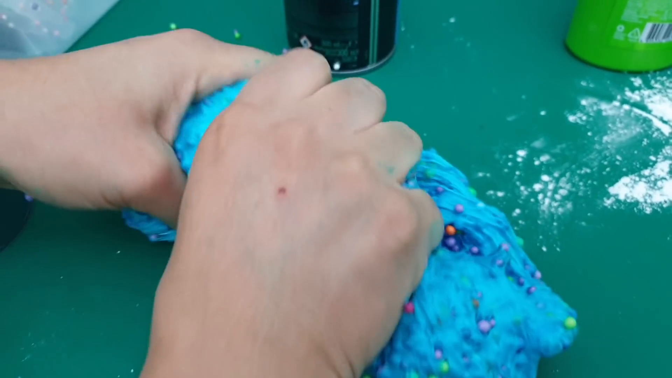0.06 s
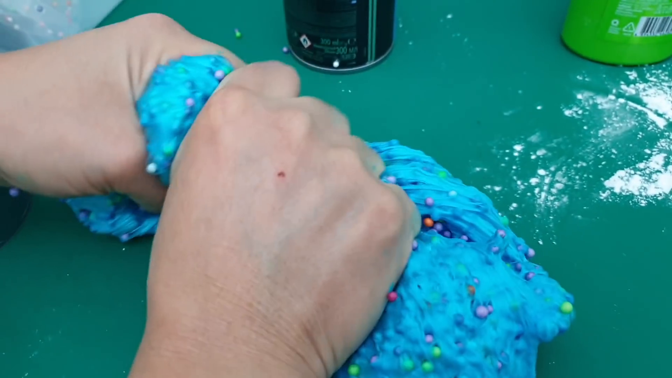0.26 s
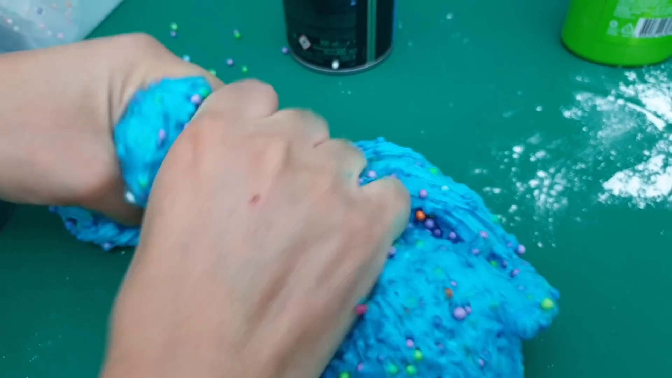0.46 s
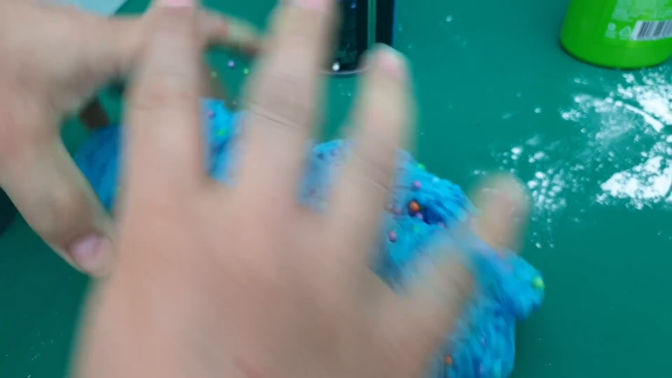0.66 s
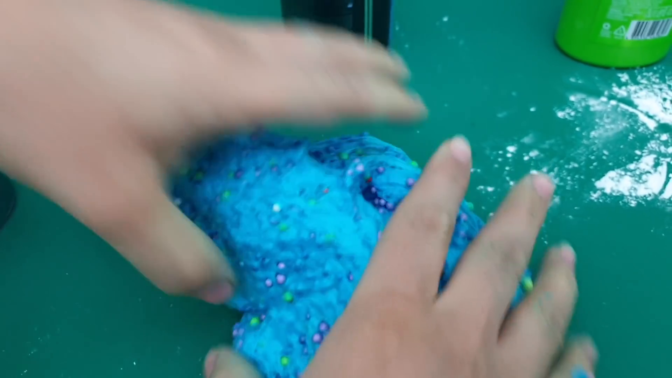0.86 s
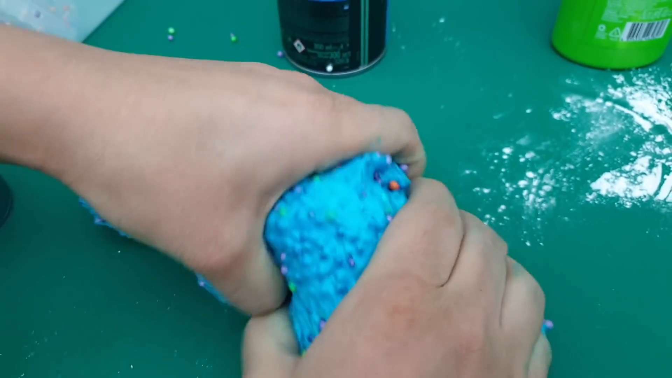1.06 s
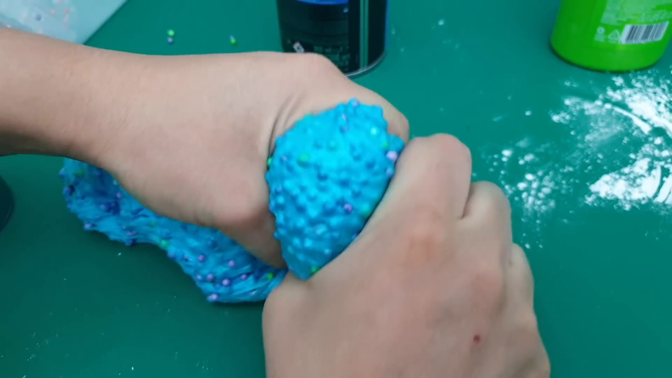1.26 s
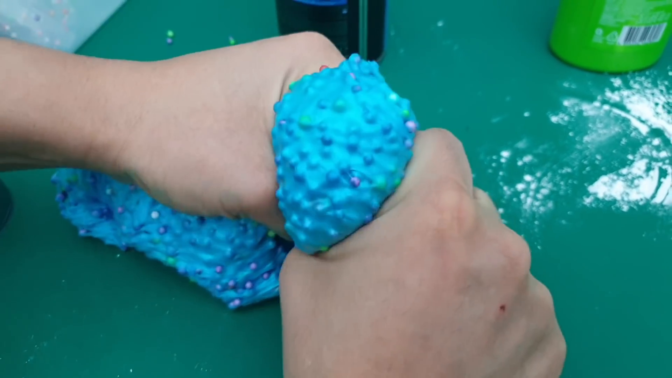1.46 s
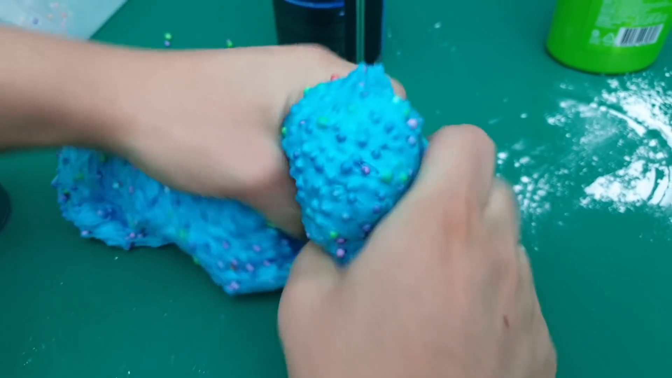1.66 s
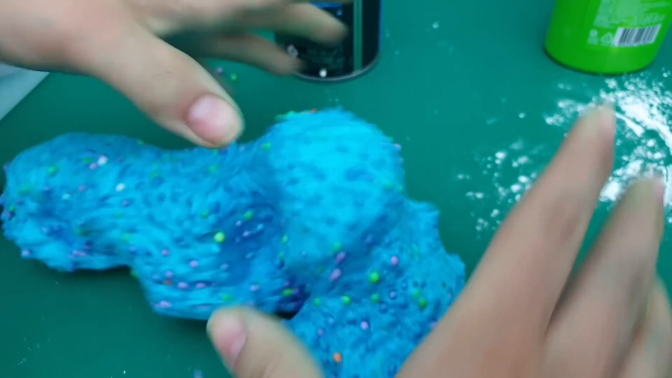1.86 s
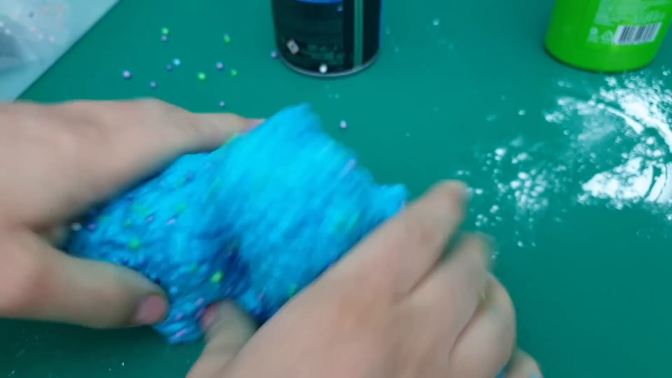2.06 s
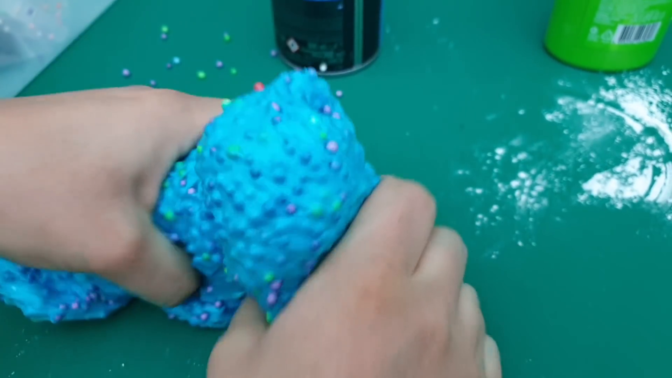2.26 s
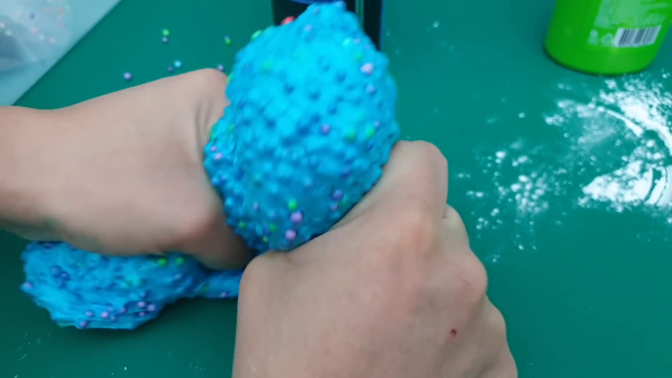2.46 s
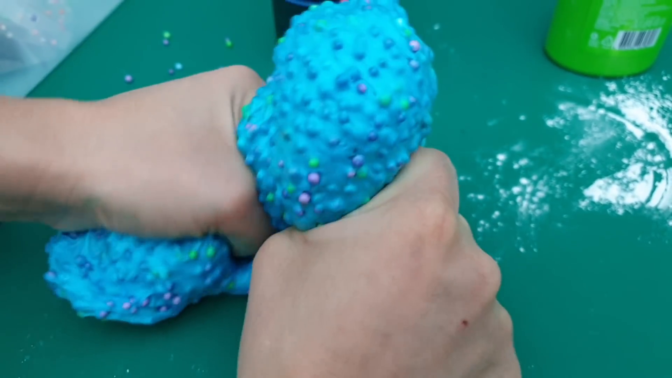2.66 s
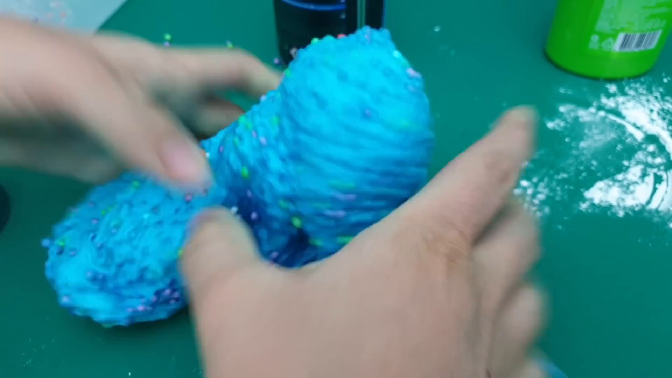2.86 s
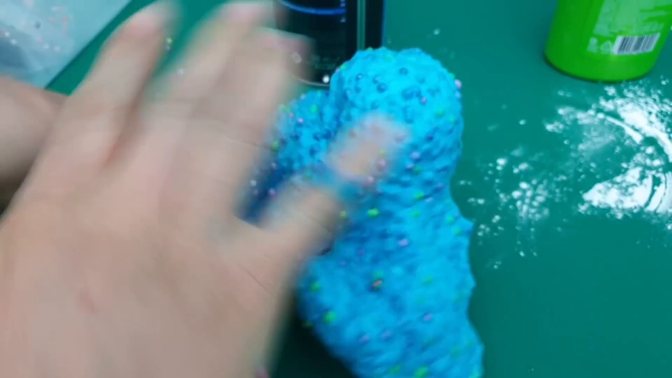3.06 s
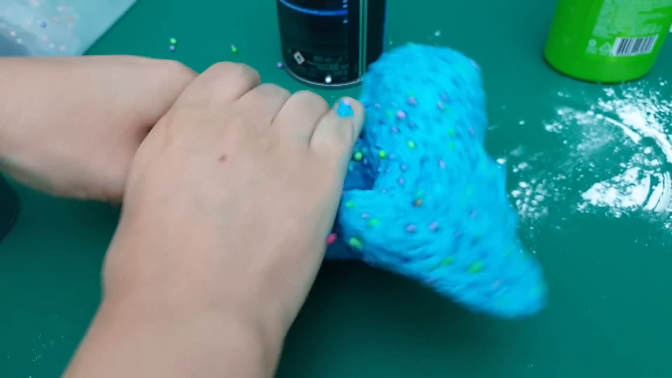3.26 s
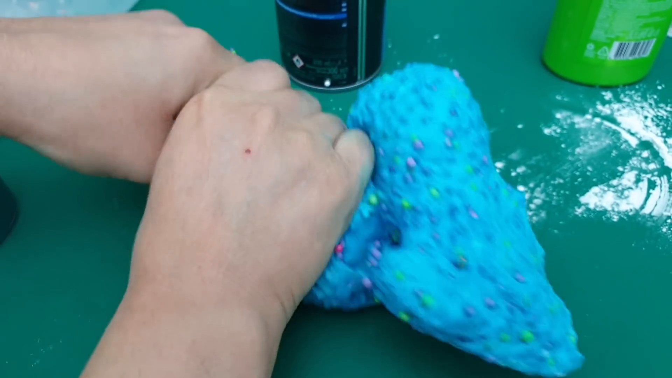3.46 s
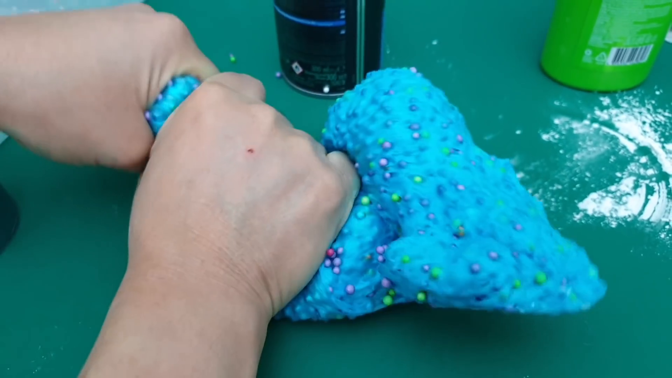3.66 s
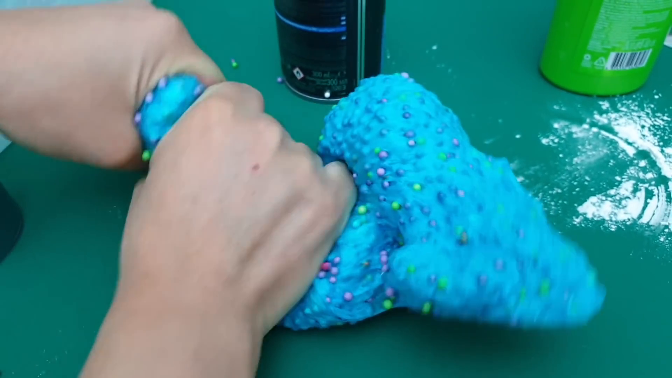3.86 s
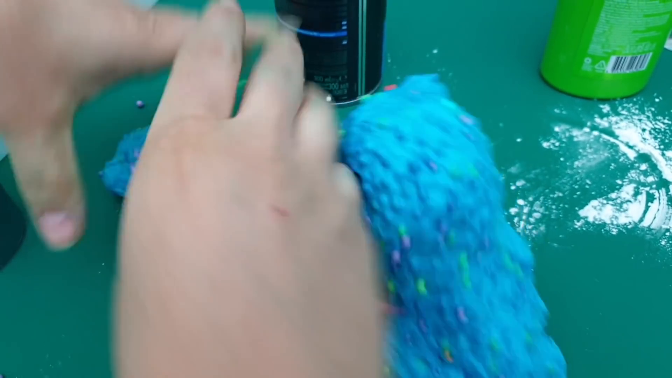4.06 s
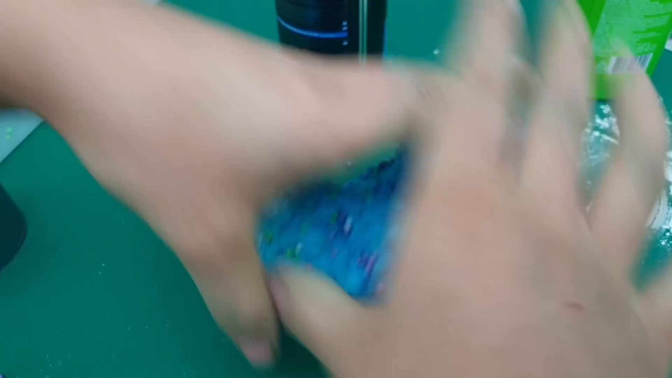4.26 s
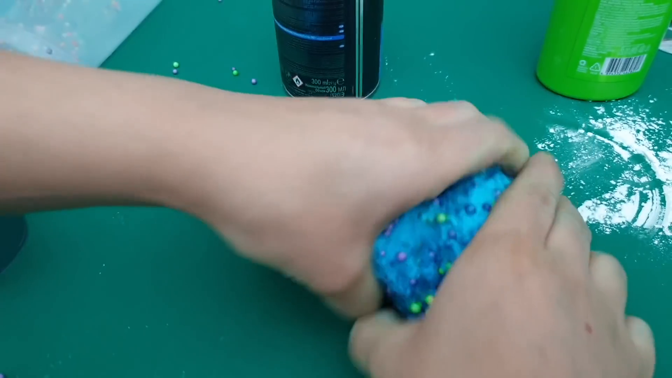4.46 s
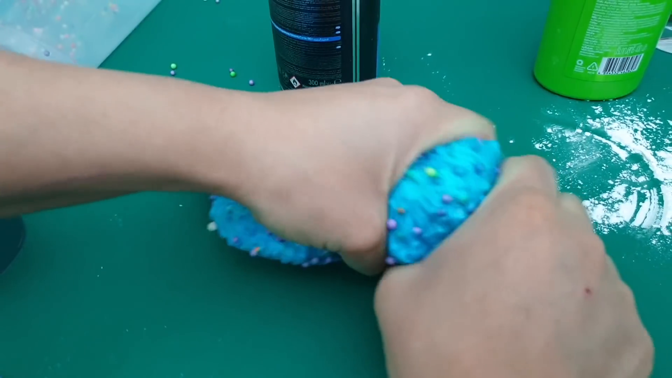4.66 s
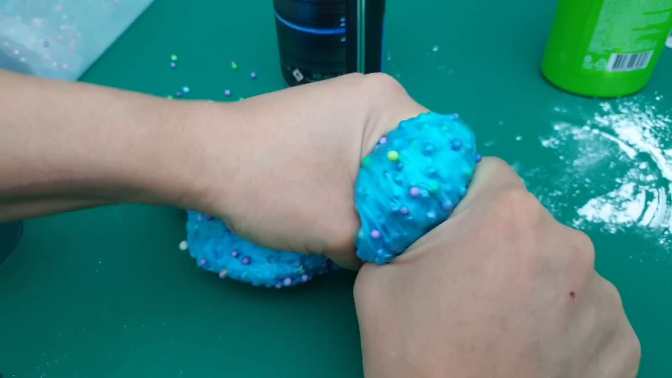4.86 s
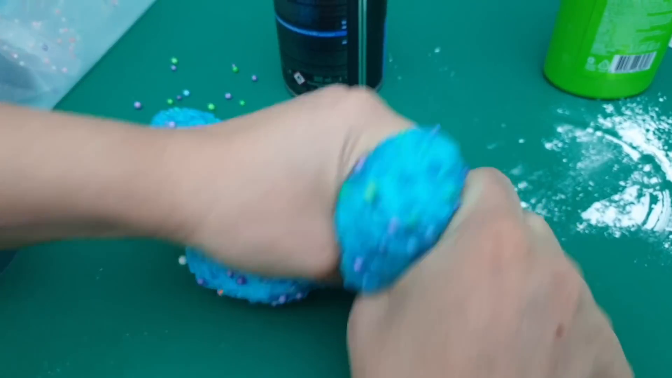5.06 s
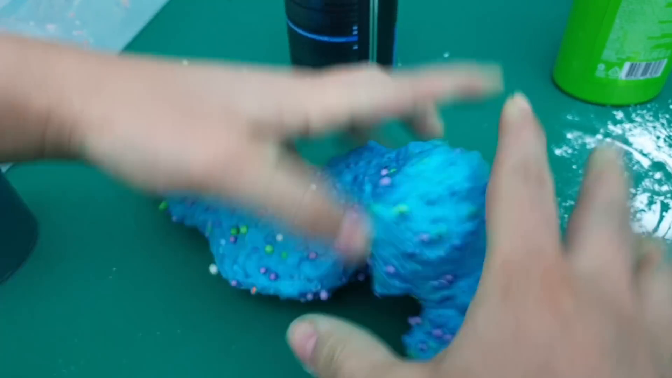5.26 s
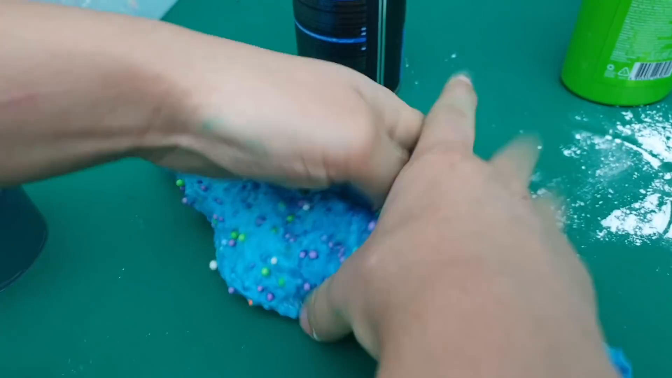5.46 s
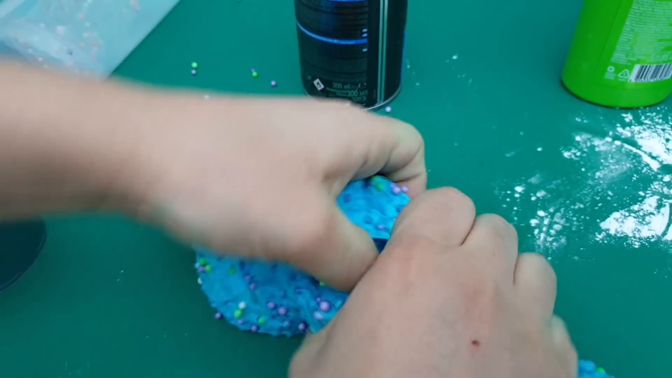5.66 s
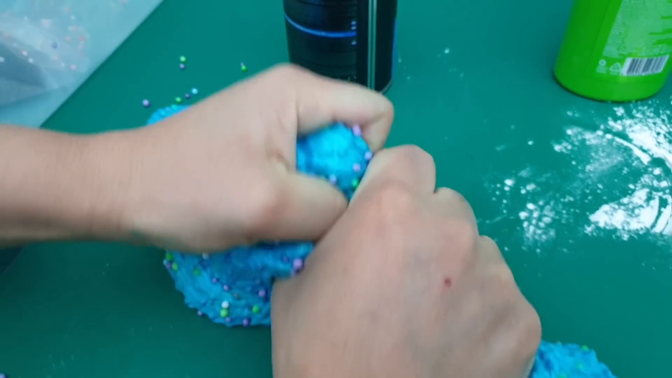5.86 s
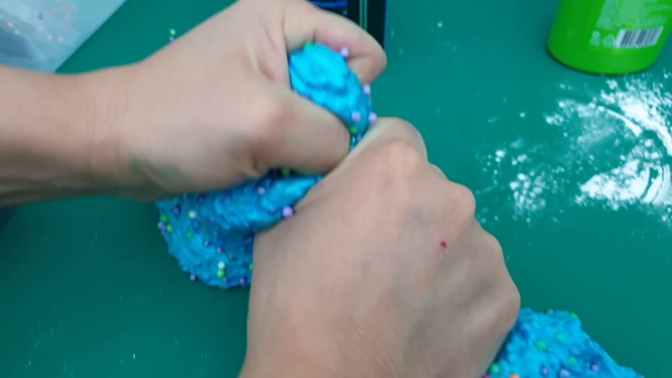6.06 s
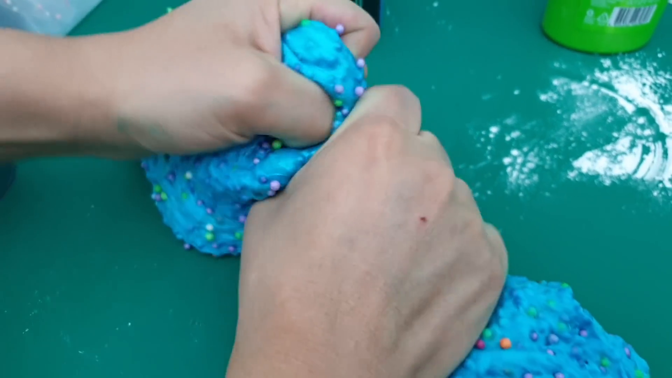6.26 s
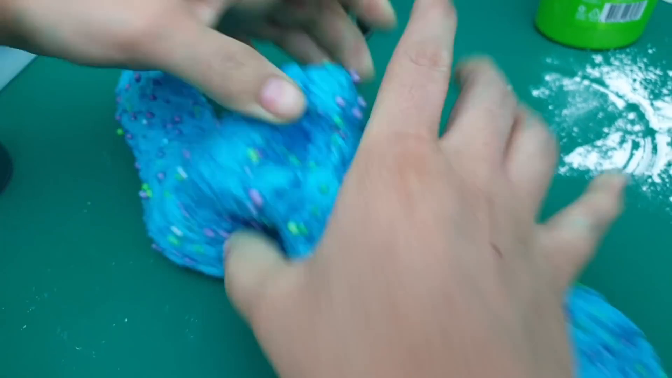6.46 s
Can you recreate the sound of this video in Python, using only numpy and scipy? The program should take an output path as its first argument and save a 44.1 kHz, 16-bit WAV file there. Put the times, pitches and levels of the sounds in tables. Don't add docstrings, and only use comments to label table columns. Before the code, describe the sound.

Close-up slime kneading: six squeezes of crisp snapping pops and fizzing beads, separated by sticky peels, small glugs and dull thumps.

```python
import sys
import numpy as np
from scipy import signal
from scipy.fft import rfft, irfft
from scipy.io import wavfile

SR = 44100
rng = np.random.default_rng(int(sys.argv[2]) if len(sys.argv) > 2 else 0)


def amplitude_ratio(level_db):
    exponent = np.asarray(level_db, float) / 20
    return 10 ** exponent


def generate_wav(signal):
    frames = np.transpose(np.atleast_2d(signal))
    scaled = np.clip(frames, -1, 1) * 32767
    pcm = np.round(scaled).astype(np.int16)
    wavfile.write(sys.argv[1], SR, pcm)


N = 287532


def rms_one(x):
    return x / np.sqrt(np.mean(x ** 2) + 1e-20)


def top_one(x):
    return x / abs(x).max(axis=-1, keepdims=True)


def louder(*levels_db):
    return 10 * np.log10(sum(amplitude_ratio(2 * np.maximum(db, -120)) for db in levels_db))


def in_time(s, db, rise, fall):
    t = np.arange(N) / SR
    before = rise * np.maximum(s[0] - t, 0)
    after = fall * np.maximum(t - s[-1], 0)
    return np.interp(t, s, db) - before - after


def at_hz(points, hz):
    point_hz, point_db = np.transpose(points)
    return np.interp(np.log(hz + 1), np.log(point_hz), point_db)


def add(out, sound, s):
    i = round(s * SR)
    out[..., i:i + sound.shape[-1]] += sound[..., :N - i]


def band(x, low_hz, high_hz):
    sos = signal.butter(2, [low_hz, min(high_hz, .45 * SR)], "band", fs=SR, output="sos")
    return signal.sosfilt(sos, x)


def ring(x, hz, t60):
    r, w = amplitude_ratio(-60 / (t60 * SR)), 2 * np.pi * hz / SR
    return signal.lfilter([0, np.sin(w)], [1, -2 * r * np.cos(w), r * r], x + 1e-18)


def peak(x, hz, width, db):
    a, w = amplitude_ratio(db / 2), 2 * np.pi * hz / SR
    k = np.sin(w) * width / hz / 2
    return signal.lfilter([1 + k * a, -2 * np.cos(w), 1 - k * a],
                          [1 + k / a, -2 * np.cos(w), 1 - k / a], x)


def drift(rate):
    r = np.exp(-80 * np.pi * rate / SR)
    noise = rng.standard_normal(N // 40 + 2002)
    slow = signal.lfilter([1], [1, -2 * r, r * r], noise)[2000:]
    return np.interp(np.arange(N) / 40, np.arange(len(slow)), rms_one(slow))


def grains(per_s, spread_db, clump_db, pan_db):
    born = rng.random(N) < per_s * amplitude_ratio(clump_db * drift(25)) / SR
    size_db = spread_db * np.minimum(rng.exponential(1, N), 3)
    sizes = born * amplitude_ratio(size_db) * rng.choice([-1, 1], N)
    side = amplitude_ratio(pan_db * rng.uniform(-1, 1, N))
    return np.array([sizes * side, np.roll(sizes / side, 7)])


def tears(clicks):
    return signal.lfilter([1], [1, -.93], abs(clicks)) * rng.standard_normal((2, N))


# frequency in Hz, level in dB per Hz.
HUSH_SPECTRUM = [(18, -42), (30, -12), (71, 23), (194, -12), (780, -34), (1250, -22), (6550, -23),
                 (8740, -51)]


def hush():
    level_db = -77.5
    hz = np.fft.rfftfreq(N, 1 / SR)
    mid, side = rfft(rng.standard_normal((2, N))) * amplitude_ratio(at_hz(HUSH_SPECTRUM, hz))
    share = np.clip(hz / 1200, .25, 1)
    noise = irfft(np.array([mid + share * side, mid - share * side]), N)
    return amplitude_ratio(level_db) * rms_one(noise)


# grip closes in seconds, hardest in seconds, lets go in seconds,
# crackle level in dB, left-right balance in dB.
SQUEEZES = [
    (0.0, 0.34, 0.33, -37, -8),
    (1.1, 1.395, 1.46, -37.5, -12),
    (2.262, 2.558, 2.536, -37, -8.5),
    (3.308, 3.773, 3.63, -45.5, 8.5),
    (4.648, 4.845, 4.92, -35.5, -13),
    (5.895, 5.973, 5.98, -40, -13),
]


def squeezing():
    swell_db, sag_db = 9.5, -1
    close_db_per_s, open_db_per_s = 187, 104
    levels = []
    for grip, hardest, off, db, pan_db in SQUEEZES:
        corners_db = [db - swell_db, db, db - sag_db]
        levels.append(in_time([grip, hardest, off], corners_db, close_db_per_s, open_db_per_s))
    return louder(*levels)


def crackle(level_db, bright_db):
    snaps = tears(grains(600, spread_db=3.4, clump_db=4.5, pan_db=4.0))
    body = amplitude_ratio(level_db - 1.5) * rms_one(band(snaps, 1200, 7660))
    fizz = amplitude_ratio(bright_db - 6.5) * rms_one(band(snaps, 6550, 14900))
    return body + fizz


# start in seconds, peak in dB, dull part in dB, brightness in dB, pocket pitch in Hz.
POPS_1 = [(0.0079, -22, -6, -18, 3580), (0.0171, -28, -17, -14, 6250), (0.0373, -9.5, -15, -14, 5410),
          (0.0487, -28, -18, -20, 4580), (0.052, -11.5, -24, -23, 5110), (0.0678, -11, -10, -20, 5100),
          (0.0701, -15, -16, -11, 6240), (0.1045, -28, -12, -17, 4210), (0.1088, -32, -16, -12, 5440),
          (0.1219, -9, -16, -12, 6080), (0.125, -15.5, -21, -10, 4220), (0.1359, -17.5, -15, 1.5, 5680),
          (0.148, -30, -25, -7, 6460), (0.1543, -12, -26.5, -13, 4590), (0.1672, -21, -17.5, -5, 4890),
          (0.1783, -22, -26, -1.5, 6160), (0.2005, -6.5, -12, -11, 5300), (0.2155, -21, -17, 1, 5060),
          (0.22, -17.5, -24, -0.5, 6910), (0.2488, -7.5, -12, -8, 6990), (0.2524, -14, -13, 2, 4700),
          (0.2913, -17, -10, -9, 5800), (0.3089, -15.5, -21, 2.5, 6730), (0.32, -16.5, -19, 6.5, 7020),
          (0.3377, -15.5, -26, 5.5, 8290), (0.357, -25, -16, 7, 7690), (0.3874, -5, -14, -6, 5190),
          (0.4212, -22, -23, 0.5, 6530), (0.427, -16.5, -29, -17, 6610), (0.4415, -13.5, -28, -16, 6210),
          (0.466, -18.5, -33, 2.5, 6430), (0.6403, -35, 2, -13, 5020), (0.6486, -31, -1, -14, 3290),
          (0.6951, -24.5, -21, -15, 6000)]
POPS_2 = [(1.0354, -34, -19, -24, 3450), (1.0579, -42, -13, -11, 6050), (1.068, -22.5, -13, -3.5, 7400),
          (1.0807, -31, -4, -14, 5750), (1.0906, -35, -12, -2, 5330), (1.1049, -24.5, -15, -16, 4770),
          (1.129, -34, -10, -16, 5230), (1.1505, -26, -13, -17, 5180), (1.1654, -29, -8, -7, 6390),
          (1.1682, -14, -10, -7, 6000), (1.172, -23, -8, -16, 5870), (1.211, -22.5, -10, -20, 5250),
          (1.263, -29.5, -25, -14, 5060), (1.2659, -19, -11, -7, 4890), (1.2895, -18, -19, -8, 4390),
          (1.327, -18.5, -16, -9, 5340), (1.332, -22, -8, -16, 4680), (1.3386, -18, -11, -10, 4960),
          (1.3499, -16.5, -15, -19, 5200), (1.3727, -16, -8, -14, 3990), (1.3931, -16.5, -3, -14, 6800),
          (1.408, -8, -29, -15, 6260), (1.4315, -8, -23, -22, 5160), (1.4423, -37, -16, -12, 5160),
          (1.447, -18.5, -21, -5, 5850), (1.4793, -22, -16, -6, 5100), (1.4825, -21, -12, -13, 5580),
          (1.4878, -21, -20, -8, 5620), (1.5283, -17.5, -6, -8, 5260), (1.5465, -24, 8, 0, 4780),
          (1.5599, -14, -22, -20, 5340), (1.5945, -26.5, -16, -17, 4610), (1.5995, -23, -25, -9, 4930),
          (1.6228, -23, -26, -10, 5540), (1.6402, -18.5, -22, -22, 6000), (1.6477, -19, -15, -9, 6610),
          (1.8018, -26.5, 4, -10, 5020)]
POPS_3 = [(2.0976, -47, 5, -22, 4840), (2.139, -17, -11, -9, 4270), (2.214, -29, -11, -20, 5130),
          (2.2352, -30, -4, -13, 4670), (2.284, -8.5, -19, -19, 5390), (2.3076, -18, -25, -22, 4720),
          (2.3254, -28.5, -11, -20, 4580), (2.3675, -25, -14, -18, 5150), (2.3723, -21.5, -20, -10, 5490),
          (2.3936, -20, 0.5, -8, 5240), (2.4026, -19, -20, -16, 4170), (2.405, -24, -15, -4, 4780),
          (2.415, -29, -5, -19, 3360), (2.4317, -17, -32, -16, 5970), (2.4732, -4.5, -27, -19, 6000),
          (2.4922, -11.5, -19, -14, 4300), (2.5261, -10.5, -2, -9, 4500), (2.5568, -26.5, 4, 9, 4800),
          (2.5875, -12, -11.5, -6.5, 4570), (2.6473, -20.5, -17, -9, 5390), (2.6657, -35, -15, 0, 5810),
          (2.6792, -11, -26, -9.5, 7020), (2.7857, -37, -17, -14, 5190), (2.7923, -40, -19, -15, 6160),
          (2.8233, -39, 0, -5, 5850), (2.9249, -28.5, 4.5, -10, 4450)]
POPS_4 = [(3.1406, -47.5, -12, -20, 3290), (3.3498, -32, -14, -8, 6430), (3.3699, -34, -1.5, -2, 6140),
          (3.3756, -38, -3, 0, 6520), (3.3785, -24.5, -26, -5, 5100), (3.4296, -22, -1, -11.5, 4160),
          (3.5539, -44, 4, -14, 4860), (3.579, -34.5, -14, -2.5, 6700), (3.6115, -34.5, -5, -13, 4390),
          (3.6193, -40, -14, 2, 5450), (3.6287, -34, -16, -4, 5840), (3.6504, -28, -1, -13, 3620),
          (3.674, -15, -26, -3, 4950), (3.6981, -20, -14, -6, 6350), (3.7093, -24.5, -14, -6, 6130),
          (3.7232, -24, -9, -10, 6290), (3.7251, -26, -15, -0.5, 6750), (3.7372, -32, -10, -8, 6700),
          (3.7442, -25, -5, -1, 7340), (3.753, -27.5, -7, -12, 4890), (3.7657, -28, -21, -9, 5280),
          (3.7819, -11.5, -25, -3, 7810), (3.7976, -12, -24, -8, 4800), (3.82, -23, -9, -9, 3380),
          (3.8584, -21, -12, -5.5, 4600), (4.1328, -31.5, -11, -7, 4400), (4.2339, -41.5, -15, -3, 4440)]
POPS_5 = [(4.4247, -38, -14, -24, 4780), (4.4433, -36, -12, -21, 3740), (4.4764, -41, -16, -17, 3690),
          (4.5023, -37, -11, 1, 6160), (4.5358, -43.5, -5, -10, 5930), (4.6383, -38, -11, -5, 5450),
          (4.6486, -31.5, 3, -14, 4650), (4.6679, -31, -4, -3, 5550), (4.678, -33, -19, -3, 5990),
          (4.7021, -20.5, -14, -11, 6000), (4.704, -24, -11, -17, 5940), (4.7383, -13.5, -11, -20, 4650),
          (4.7407, -20, -15, -19, 4700), (4.7544, -1.5, -11, -16.5, 6090), (4.793, -13.5, -12, -8, 5410),
          (4.7957, -17.5, -18, -3, 5570), (4.816, -14, -16, -3, 6340), (4.8194, -14, -26, -14, 6880),
          (4.8522, -14.5, -0.5, -3, 5080), (4.86, -14, -24, -1, 7390), (4.8658, -4.5, -14.5, -6, 5470),
          (4.89, -10.5, -24, -11, 6300), (4.9072, -8.5, -17, -10, 4930), (4.9313, -6.5, -24, -4.5, 6340),
          (4.9795, -10, -20, -3, 6130), (5.0639, -22.5, -13, 0.5, 6300)]
POPS_6 = [(5.476, -50, -6, -12, 5960), (5.5862, -48, -6, -7, 6160), (5.8306, -32.5, -10, -13, 5210),
          (5.8678, -33, -3, -3, 5700), (5.9156, -29, -10, -7, 6130), (5.919, -37, -12, -5, 5700),
          (5.935, -3, -14, -8, 5870), (5.9377, -8.5, -8, -10, 5110), (5.9859, -16.5, -22, -1, 6880),
          (5.9993, -25, -19, -11, 6050), (6.009, -23, -10, -8, 6390), (6.0255, -11.5, -11, -7, 6230),
          (6.0601, -23, -7, -5, 5540), (6.0828, -28, -9, -4, 5210), (6.0948, -28, -9, -12, 4490),
          (6.13, -19.5, -23, -19, 5530), (6.1431, -13.5, -3, -6.5, 6950), (6.2835, -33, -23, -5, 6100)]


def pockets():
    spread_db = 6.5
    bursts = []
    for squeeze, rows in zip(SQUEEZES, [POPS_1, POPS_2, POPS_3, POPS_4, POPS_5, POPS_6]):
        for s, peak_db, low_db, bright_db, hz in rows:
            pan_db = squeeze[-1] + spread_db * rng.standard_normal()
            bursts.append((s, peak_db, pan_db, low_db, bright_db, hz))
    return bursts


def pops(tear_s, cycles, rasp_db, dull_db, bounce_db):
    out, t = np.zeros((2, N)), np.arange(400) / SR
    sides = np.array([[.5], [-.5]])
    for s, peak_db, pan_db, low_db, bright_db, hz in pockets():
        lasts = tear_s * amplitude_ratio(0.15 * (peak_db + 40.0))
        tear = rng.standard_normal((2, len(t))) * np.exp(-t / lasts) * np.minimum(t / 0.00029, 1)
        rupture = np.sign(tear[0, 9]) * (np.arange(len(t)) == [[8], [14]])
        snap = tear + 6.0 * rupture
        rasp = amplitude_ratio(rasp_db) * band(snap, 2900, 8000)
        pocket = top_one(.4 * ring(snap, hz, cycles / hz) + rasp)
        bright = top_one(band(snap, 9970, 12940))
        thump = ring(np.exp(-t / .0001), hz / 6, 0.001)
        knock = top_one(band(thump, 507, 3000)) + amplitude_ratio(6.5) * top_one(band(snap, 900, 3700))
        body = pocket * amplitude_ratio(sides * (pan_db + 4.0))
        body = body + bright * amplitude_ratio(bright_db + 7.0 + sides * (0.57 * pan_db + 2.5))
        add(out, amplitude_ratio(peak_db - 1.5) * (body + amplitude_ratio(low_db + dull_db) * knock), s - .0002)
    bounce = np.zeros_like(out)
    add(bounce, amplitude_ratio(bounce_db) * band(out, 800, 9000), .0027)
    return out + bounce


# start in seconds, squelch level in dB,
# length in seconds, stickiness in dB.
PEELS = [(.01, -47.5, 0.15, -2), (0.2, -39, 0.024, 2), (0.579, -38, 0.071, -5), (1.067, -50, 0.028, 12),
         (1.528, -44, 0.038, 10), (1.758, -36, 0.052, -2), (1.942, -64.5, 0.071, 3), (2.166, -58, 0.11, 11),
         (2.523, -61, 0.023, -5), (2.749, -62.5, 0.075, 12), (2.846, -35, 0.045, -3),
         (2.932, -47, 0.042, -0.5), (3.15, -64, 0.11, 3), (3.4, -51.5, 0.063, -10), (3.708, -53, 0.032, 12),
         (3.982, -37, 0.044, -2), (4.107, -50.5, 0.064, -3.5), (4.398, -57.5, 0.16, 2.5),
         (4.713, -47, 0.031, 5), (5.191, -42, 0.064, -1.5), (5.241, -39, 0.029, -3),
         (5.356, -55, 0.048, -7), (5.478, -48.5, 0.013, 2), (5.514, -53, 0.057, -2.5),
         (5.678, -46.5, 0.054, -2), (5.96, -50, 0.0046, -1), (6.143, -48.5, 0.037, 15),
         (6.25, -57.5, 0.1, -1), (6.386, -43.5, 0.051, -6)]


def peeling(sticky_share):
    rise_db, fall_db, grow_db = 20, 11, 2
    levels = []
    for s, db, lasts, sticky_db in PEELS:
        corners_db = np.array([db - grow_db, db]) + sticky_share * sticky_db
        levels.append(in_time([s, s + lasts], corners_db, rise_db / lasts, fall_db / lasts))
    return louder(*levels)


def squelch(level_db, sticky_db):
    clicks = grains(1100, spread_db=4.0, clump_db=4.5, pan_db=3.0)
    pitches = np.geomspace(380, 2400, 12)
    dealt = rng.integers(0, 12, N)
    sizes = amplitude_ratio(-6.0 * np.log2(pitches / 640) ** 2)
    rings = sum(sizes[k] * ring(clicks * (dealt == k), hz, 7 / hz) for k, hz in enumerate(pitches))
    wet = rms_one(band(rings, 254, 5000))
    threads = rms_one(band(tears(clicks), 930, 5500))
    return amplitude_ratio(level_db - 9.0) * (wet + amplitude_ratio(sticky_db) * threads)


# start in seconds, peak in dB, settling time in seconds.
THUDS = [(.04, -44, 0.13), (.56, -35.5, 0.081), (.78, -58, 0.011), (1.031, -40, 0.058), (1.25, -43, 0.024),
         (1.74, -38, 0.088), (1.81, -34.5, 0.037), (2.019, -42.5, .07), (2.092, -36, 0.043),
         (2.191, -42, 0.087), (2.29, -53, 0.047), (2.418, -29, 0.037), (2.6, -50, 0.066),
         (2.84, -43, 0.098), (3.125, -38.5, 0.092), (3.365, -38, 0.062), (3.429, -55, 0.043),
         (3.553, -42.5, 0.098), (3.775, -35, 0.079), (3.947, -40, 0.06), (4.003, -31, 0.053),
         (4.089, -48, 0.068), (4.23, -33.5, 0.096), (4.434, -29, 0.046), (4.51, -53, 0.029),
         (4.68, -39, .06), (5.065, -40.5, 0.062), (5.2, -44, 0.079), (5.33, -47, 0.043),
         (5.475, -36.5, 0.07), (5.575, -39, 0.033), (5.692, -31.5, 0.062), (6.42, -50, 0.056)]
# frequency in Hz, level in dB, 60 dB decay in seconds.
TABLE_MODES = [(70, -22.5, 0.073), (112.7, 0, 0.093), (189.7, -4, 0.037), (244, -11.5, 0.076),
               (325, -33, 0.04)]


def table(rumble_db):
    settling, t = np.zeros(N), np.arange(SR // 2) / SR
    for s, db, settle_s in THUDS:
        add(settling, amplitude_ratio(db) * np.exp(-t / settle_s) * (1 - np.exp(-t / 0.0048)), s)
    landing = settling * amplitude_ratio(2.5 * drift(30))
    force = landing + amplitude_ratio(rumble_db - 1.5 + 3 * drift(14))
    mid, side = force * rng.standard_normal((2, N))
    side = 0.2 * side
    shake = np.array([mid + side, mid - side])
    return amplitude_ratio(-32.0) * sum(amplitude_ratio(db) * ring(shake, hz, t60) for hz, db, t60 in TABLE_MODES)


# start in
# seconds, peak in dB, pitch in Hz.
GLUGS = [(0.064, -40, 690), (0.198, -18, 694), (0.283, -21.5, 870), (0.588, -32, 507), (0.614, -29, 503),
         (0.623, -21, 533), (0.639, -17.5, 607), (0.648, -31, 493), (0.657, -43, 498), (0.681, -36, 583),
         (0.703, -27, 721), (1.371, -31, 1060), (1.521, -16.5, 800), (1.544, -23, 1100),
         (1.564, -41, 740),
         (1.747, -46, 1800), (1.747, -35, 393), (1.759, -36, 610), (1.773, -31, 714), (1.8, -23, 680),
         (2.814, -47, 646), (2.822, -36, 860), (2.85, -24, 668), (2.856, -19, 633), (2.877, -21, 630),
           (2.883, -19, 586), (2.923, -24, 510),
         (2.392, -37, 1220), (2.51, -48, 624), (2.524, -19, 1150), (2.554, -28, 1070), (3.648, -33, 645),
           (3.718, -17.5, 790), (3.728, -22.5, 650), (3.744, -45, 635), (3.818, -32, 664),
           (3.991, -35, 590), (4.021, -19.5, 845), (4.039, -31, 630),
         (5.192, -25, 930), (5.202, -45, 600), (5.234, -30, 1800), (5.248, -34, 630), (5.26, -25, 700),
           (5.27, -22, 1650), (5.284, -20.5, 633), (5.345, -32, 564), (5.528, -35, 394), (5.549, -34, 570),
           (5.579, -34.5, 555), (5.699, -23.5, 1150), (5.971, -21.5, 820), (6.385, -36, 864),
           (6.409, -28, 726), (6.444, -27, 600)]


def glugs(rise_cycles, cycles, climb):
    out, t = np.zeros(N), np.arange(900) / SR
    for s, peak_db, hz in GLUGS:
        turns = hz * t
        swell = (1 - np.exp(-turns / rise_cycles)) ** 2
        tone = np.sin(2 * np.pi * turns * (1 + climb * turns)) * swell * np.exp(-(turns / cycles) ** 2)
        add(out, amplitude_ratio(peak_db - 13.0) * top_one(tone), s)
    return np.array([out * amplitude_ratio(1.2), np.roll(out, 11) / amplitude_ratio(1.8)])


# start in seconds, peak in dB, starting pitch of the swing in Hz.
PUFFS = [
    (0.321, -26.5, 81),
    (1.429, -21, 85),
    (2.472, -31, 92),
    (4.891, -16.5, 79),
    (5.935, -36, 92.5),
    (6.142, -7, 90),
]


def puffs(fall_s, die_s, end_share):
    out, t = np.zeros((2, N)), np.arange(8000) / SR
    lead = np.array([[.25], [-.25]])
    for s, peak_db, start_hz in PUFFS:
        hz = start_hz * (end_share + (1 - end_share) * np.exp(-t / fall_s))
        phase = 2 * np.pi * np.cumsum(hz) / SR
        swing = np.sin(phase + lead - .4) * (t / die_s) * np.exp(1 - t / die_s)
        spike = 1.5 * np.exp(-t / .0003)
        hiss = amplitude_ratio(-15.0) * band(rng.standard_normal((2, len(t))), 4300, 9800)
        hiss = hiss * np.exp(-t / 0.054) * amplitude_ratio(1.7 * np.sin(phase))
        add(out, amplitude_ratio(peak_db - 1.5) * (swing - spike + hiss), s + 0.00104)
    return out


# frequency in Hz, 60 dB decay in seconds.
ROOM_T60 = [(300, 0.2), (1300, 0.44), (4000, 0.36), (12000, 0.4)]


def room(x, near_db, near_s, tail_db):
    out, edges = x.copy(), 250 * 2 ** np.arange(0, 6.3, .67)
    white = rng.standard_normal((2, 2, N))
    lumps = amplitude_ratio(2 * near_db + 8 * drift(250))
    patches = amplitude_ratio(5 * drift(40))
    for k, (low, high) in enumerate(zip(edges, edges[1:])):
        energy = np.roll(np.mean(band(x, low, high) ** 2, axis=0), 70)
        near, far = np.exp(-1 / (near_s * SR)), amplitude_ratio(-120 / (at_hz(ROOM_T60, low) * SR))
        echoes = lumps * signal.lfilter([1 - near], [1, -near], energy)
        lingering = signal.lfilter([1 - far], [1, -far], energy)
        tail = np.roll(patches, 300 * k) * amplitude_ratio(2 * tail_db) * lingering
        soak = amplitude_ratio(-1.5 * np.log2(low / 2000))
        mid, side = rms_one(band(white[k % 2], low, high))
        side = side * min(low / 1400, 1)
        out += soak * np.sqrt(echoes + tail) * np.array([mid + side, mid - side])
    return out


def scene():
    squeeze_db, peel_db, sticky_db = squeezing(), peeling(0), peeling(1)
    snap_db = louder(squeeze_db, sticky_db - 3)
    fizz_db = louder(squeeze_db + 0.5, sticky_db - 2.5)
    wet_db = louder(peel_db, squeeze_db - 10)

    slime = pops(tear_s=0.0005, cycles=7, rasp_db=-1.5, dull_db=-8.5, bounce_db=-7.5)
    slime = slime + glugs(rise_cycles=0.33, cycles=3.3, climb=0.0044)
    slime = slime + crackle(snap_db, fizz_db)
    slime = slime + squelch(wet_db, sticky_db=0.0)

    jets = puffs(fall_s=.016, die_s=0.0065, end_share=0.4)
    lows = table(-58 + 0.25 * (snap_db - snap_db.mean())) + jets
    in_room = room(slime, near_db=-8.5, near_s=0.00046, tail_db=-6.5)
    return in_room + lows + hush()


def roll_off(x):
    return signal.sosfilt(signal.butter(12, 17030, fs=SR, output="sos"), x)


# frequency in Hz, width in Hz, boost in dB.
PORTS = [
    [(7094, 790, 5.5), (8010, 540, -10), (10900, 15000, 5)],
    [(5390, 6960, 6.5), (9260, 890, -17.5), (12830, 1240, -1.5)],
]


def record(dry):
    full_scale = .9
    ports = []
    for x, cavity in zip(dry, PORTS):
        for hz, width, db in cavity:
            x = peak(x, hz, width, db)
        ports.append(x)
    clipped = np.clip(ports, -full_scale, full_scale)
    top_cut = signal.cheby2(12, 60, 17000, fs=SR, output="sos")
    mix = signal.sosfilt(top_cut, clipped)
    return roll_off(mix)


dry = scene()
out = record(dry)
generate_wav(out)
```